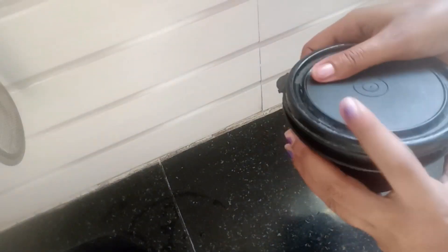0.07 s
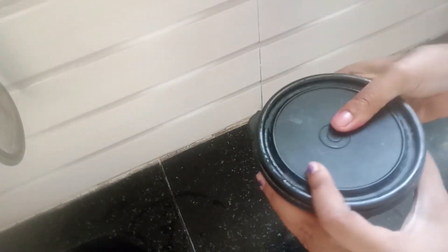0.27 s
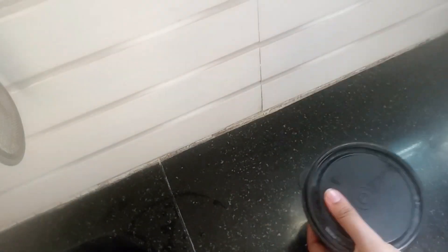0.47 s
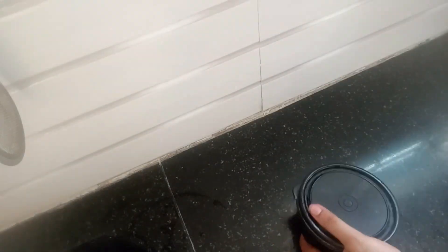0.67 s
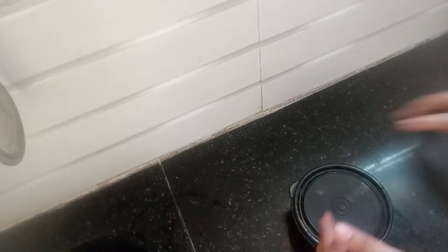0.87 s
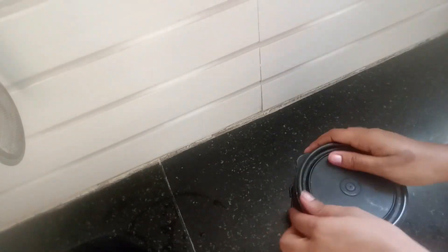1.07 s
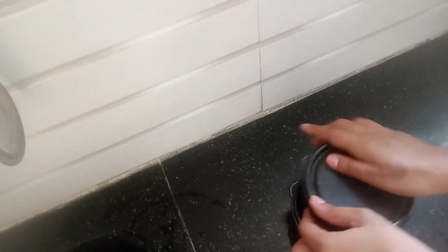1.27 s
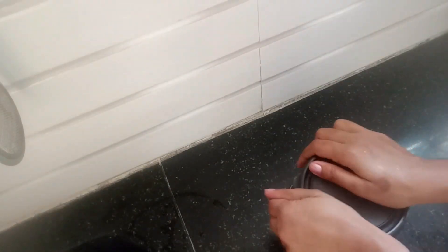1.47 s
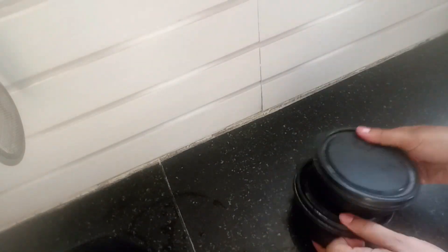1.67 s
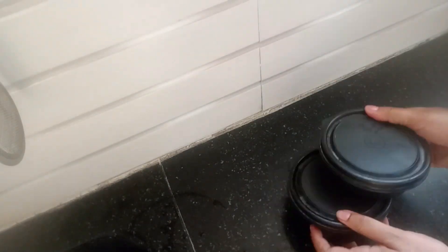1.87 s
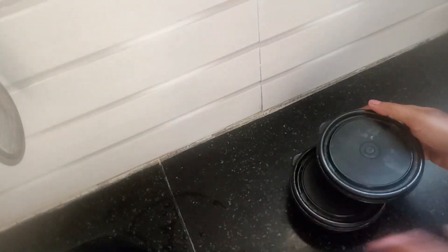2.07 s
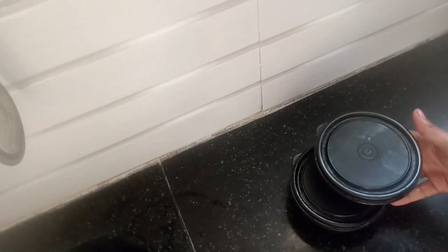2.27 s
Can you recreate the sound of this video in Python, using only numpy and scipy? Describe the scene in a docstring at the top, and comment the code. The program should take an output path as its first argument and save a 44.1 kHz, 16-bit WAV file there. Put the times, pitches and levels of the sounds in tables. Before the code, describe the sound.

Plastic lunch box lid snaps shut, box knocks onto stone counter, second box stacked and slid

```python
"""A round plastic lunch box clicks shut and is set down on a stone kitchen counter, knocking and rocking.
Its rim scrapes as it is pressed home; a second box is put on top and slid along with a hollow groan.
Faint creaks and thin high jingles come and go throughout, over quiet room noise.
Knocks and bumps are sums of decaying modes; scrapes are random stick-slip clicks through resonances;
the groan is a roughened tone, creaks and jingles are narrow-band noise, and the room is shaped noise."""
import sys
import numpy as np
from scipy import signal
from scipy.fft import rfft, irfft, next_fast_len
from scipy.io import wavfile

SR = 44100
rng = np.random.default_rng(int(sys.argv[2]) if len(sys.argv) > 2 else 0)


def transcribe(u):
    """Save the signal u as a 16-bit wav file named by the first command-line argument.

    u: samples, shape (n,) or (channels, n), limited to [-1, 1]; the rate is SR.
    q: integer samples, one column per channel.
    """
    v = np.clip(np.atleast_2d(u).T, -1, 1)
    q = np.round(v * 32767).astype(np.int16)
    wavfile.write(sys.argv[1], SR, q)


N = 101518
T = np.arange(N) / SR  # time in seconds

# Spectrum of the room noise. Each row: frequency in Hz, relative level in dB.
AIR_SPECTRUM = [(120, -38.5), (200, 0.5), (409, 0), (519, -2.5), (851, -5), (1230, -7.5), (1590, -8.5),
                (2610, -15), (3690, -13), (6520, -22), (9400, -14.5), (10700, -26), (14900, -31),
                (16000, -54)]
# Course of the room noise. Each row: time in seconds, level in dB.
AIR_LEVEL = [(0, -55), (.6, -55), (1.2, -51.5), (1.4, -64.5), (1.76, -62.5), (2.0, -58), (2.3, -58)]
# Spectrum of the low room rumble. Each row: frequency in Hz, relative level in dB.
RUMBLE_SPECTRUM = [(20, -10), (50, -1.5), (85, -4.5), (120, 0.5), (165, -3.5), (230, -17.5), (500, -27),
                   (16000, -75)]
# Course of the rumble. Each row: time in seconds, level in dB.
RUMBLE_LEVEL = [(0, -53), (.4, -53), (.9, -50.5), (1.25, -53.5), (1.5, -71), (1.8, -63), (2.3, -59.5)]
# Low creaks of plastic and thin high jingles. Each row: peak in seconds, # time from peak to 1/e in seconds,
# pitch in Hz, width in Hz (doubled in each of two resonators), level in dB.
CREAKS_AND_JINGLES = [ (0.248, 0.026, 782, 71, -45), (0.256, 0.011, 7150, 194, -67),
                      (0.545, 0.048, 4630, 130, -59), (0.542, 0.019, 9340, 200, -62),
                      (0.6, 0.024, 800, 123, -49.5), (0.777, 0.015, 578, 61, -44),
                      (0.986, 0.037, 4800, 252, -54.5), (0.999, 0.0066, 1930, 300, -37),
                      (1.11, 0.019, 4510, 244, -51), (1.195, 0.11, 4550, 350, -55),
                      (1.396, 0.006, 830, 60, -42), (1.397, 0.0079, 1960, 127, -30),
                      (1.401, 0.01, 9470, 400, -38.5), (1.443, 0.052, 457, 38.8, -46),
                      (1.54, 0.023, 8200, 250, -51.5), (1.694, 0.029, 7160, 248, -51.5),
                      (1.818, 0.028, 7000, 148, -57.5), (1.823, 0.028, 8100, 200, -57),
                      (1.8, 0.021, 11600, 900, -60), (1.912, 0.0086, 2460, 60, -31),
                      (1.979, 0.028, 8050, 130, -49.5), (2.006, 0.028, 6950, 150, -58),
                      (2.074, 0.017, 7200, 276.7, -47.5), (2.102, 0.0088, 8160, 150, -48.5),
                      (2.153, 0.017, 6900, 130, -44), (2.158, 0.023, 8240, 128, -45),
                      (2.221, 0.021, 7430, 60.5, -43), (2.254, 0.028, 7050, 306, -46.5),
                      (2.245, 0.018, 9240, 100, -50), (2.286, 0.0043, 1690, 148, -43),
                      (2.289, 0.0091, 8330, 357, -34.5)]
# Groan of the sliding upper box. Each row: time in seconds, level in dB, pitch in Hz.
SLIDE = [(2.02, -95, 492), (2.04, -51, 508), (2.09, -37.5, 517), (2.13, -38, 435.5), (2.146, -51.5, 444),
         (2.188, -40.5, 498), (2.21, -59, 513), (2.234, -82, 426), (2.268, -42, 412), (2.3, -33.5, 515)]
# Soft bumps of the hands on the box. Each row: start in seconds, mode in Hz, level in dB.
BUMPS = [(0.137, 300, -31.5), (0.142, 108, -38), (0.361, 288, -35), (1.166, 264, -34), (1.256, 240, -28),
         (1.386, 106, -25.5), (1.467, 114, -36), (1.554, 240, -22.5), (1.556, 466, -32), (1.686, 287, -26)]
# Rim scraping and fingers brushing; the row at 1.934 s is the bright treble crack of the knock there. # Each
# row: peak in seconds, rise and fall to 1/e in seconds, # levels of bass, middle, treble and top fizz in dB.
SCRAPES = [ (0.0274, 0.0051, 0.011, -36.5, -29.5, -42, -64), (0.122, 0.0033, 0.03, -41.5, -47, -47.5, -55),
           (0.373, 0.013, .04, -47.5, -55, -65, -70), (0.405, 0.0094, 0.017, -70, -71, -60, -66),
           (0.721, 0.0046, 0.024, -71, -53, -43, -56), (0.87, 0.027, 0.087, -63, -62, -58, -65),
           (0.938, 0.0098, 0.0089, -26.5, -24, -35.5, -70), (1.011, 0.01, 0.0049, -33.5, -25, -43.5, -76),
           (1.025, .01, 0.072, -54, -71, -68, -77), (1.176, 0.011, 0.027, -46, -64, -54.5, -78),
           (1.262, 0.014, 0.026, -50.5, -48, -58, -75), (1.330, 0.03, 0.017, -53, -52.5, -52, -61),
           (1.385, 0.0012, 0.008, -50.5, -31.5, -43, -43), (1.398, 0.0036, 0.012, -40, -29, -41, -39.5),
           (1.472, .03, 0.021, -55, -52.5, -58, -60), (1.534, 0.024, 0.042, -50.5, -52, -53, -65),
           (1.615, 0.0056, 0.015, -49, -45.5, -35.5, -60), (1.685, 0.036, 0.026, -44.5, -52.5, -53.5, -58),
           (1.887, 0.021, 0.036, -43.5, -66, -56, -63), (1.934, 0.003, 0.0072, -32, -53, -24.5, -30),
           (1.983, 0.015, 0.017, -65, -60, -44.5, -62), (2.074, 0.031, 0.026, -57, -54.5, -49, -52),
           (2.144, .011, 0.018, -64, -59, -40.5, -46.5), (2.243, 0.019, 0.084, -70, -75, -61, -49.5)]
# Spectra of the scraping layers. Each row: frequency in Hz, relative level in dB.
SCRAPE_BASS = [(40, -29), (105, 4), (155, -15), (230, 2.5), (330, 1.5), (500, -10), (750, -20),
               (1500, -36.5), (16000, -40)]
SCRAPE_TREBLE = [(100, -49), (1800, -27), (3300, 0), (5200, 3.5), (6500, 0.5), (8200, 6.5), (9700, 10),
                 (11200, -11.5), (16000, -12)]
SCRAPE_FIZZ = [(100, -38), (7000, -38), (10500, -3), (12000, -6), (16000, -12.5)]
# Resonances of the flexing lid. Each row: frequency in Hz, width in Hz, relative level in dB.
LID_MODES = [(515, 210, 5.5), (812, 130, 8.5), (1063, 124, 8.5), (1380, 420, 2), (1860, 260, 2),
             (2510, 900, -11.5), (2920, 860, -11), (3660, 230, 1), (5500, 510, -13.5)]
# Plastic knocks. Each row: start in seconds, wall pitch in Hz, wall level in dB, wall T60 in seconds,
# hollow level in dB, shell level in dB, shell tilt in dB per octave, crack level in dB,
# snap level in dB (before doubling).
KNOCKS = [ (0.0302, 550, -7.5, 0.035, -41, -26, -4, -26, -5),
          (0.0304, 729, -21, 0.056, -38, -29, -7, -35, -11),
          (0.6286, 291, -4, 0.049, -39, -10.5, -2, -17.5, -6.5),
          (0.6386, 358, -9.5, 0.013, -23, -14, -1, -26, -43),
          (0.7459, 324.6, -17, 0.062, -46, -35, 5, -35, -25),
          (0.7509, 315, -17.5, 0.033, -30, -26.5, -5, -33.5, -46),
          (0.7584, 430, -15, 0.026, -35, -34.5, 1, -35, -24),
          (0.931, 398, -17, 0.046, -27, -34.5, -13, -35, -9.5),
          (0.935, 501, -20, 0.046, -17.5, -21.5, 8.5, -27.5, -4),
          (0.9425, 402, -17.5, 0.033, -22, -43, -1, -53, -32),
          (1.0112, 498, -23.5, .055, -43, -46, -9, -35, -18),
          (1.0699, 318, -52, 0.026, -39, -47.5, 19.5, -40, -29),
          (1.3847, 328, -45.5, .05, -29, -25, -1.5, -41, -46),
          (1.394, 450, -43, 0.078, -24.5, -50, 4, -41, -38),
          (1.7859, 358, -46.5, 0.068, -53, -50, 17, -46, -54),
          (1.9003, 413, -12.5, 0.088, -25.5, -15.5, 3.5, -27, -12),
          (1.9103, 413, -40, 0.058, -16, -19, 2, -28, -35),
          (1.9336, 298.4, -5.5, 0.04, -21, -28, 8, -38, -34),
          (1.934, 554, -8, 0.029, -48, -26, -4.5, -30, -15),
          (2.2836, 450, -50, 0.045, -60, -57, -6, -41, -41)]
# Stiff modes of the box. Each row: frequency in Hz, relative level in dB, T60 in seconds.
SHELL_MODES = [(1050, -6.5, 0.029), (1184, -7, 0.024), (1233, -14, 0.048), (1388, -9, 0.022),
               (1670, -24.5, 0.041), (2150, -13.5, 0.035), (2442, -17, 0.023), (3273, -10, 0.022),
               (3583, -13.5, 0.058), (3924, -9.5, 0.032), (5155, -13, 0.023), (7010, -18.5, 0.028),
               (8500, -17, 0.034), (9870, -20.5, 0.044)]
# Spectrum of a crack. Each row: frequency in Hz, relative level in dB.
CRACK_SPECTRUM = [(60, -48), (300, 1), (750, 8), (1200, 11), (1900, 6), (2900, -8.5), (3800, 3.5),
                  (5300, 5), (7000, 0.5), (9600, 3), (11500, -8.5), (16000, -13)]

ROOM_DB, ROOM_DELAY_S, ROOM_T60_S, ROOM_TOP_HZ = -22.5, 0.0085, 0.13, 6030
SLIDE_ROUGH, SLIDE_WIDTH_HZ = 0.5, 55  # depth and bandwidth of the judder
BUMP_RISE_S, BUMP_T60_S = 0.0045, 0.047
SLIPS_PER_S, SLIP_SPREAD_DB, RUB_HISS, LID_TOP_HZ = 2500, 3.5, 0.53, 5940
HOLLOW_HZ, HOLLOW_T60_S = 220.5, 0.077
MODE_SPREAD_DB, MODE_DETUNE = 0.5, 0.0019  # random spread of mode level, and of pitch as a fraction
CRACK_T60_S, SNAP_HZ, PLASTIC_TOP_HZ = 0.027, 3130, 9300
RADIATE_SHARE = 0.67  # radiation cutoff as a share of the mode's frequency
BASS_CUT_HZ, TOP_CUT_HZ = 75, 15700


def from_db(db):
    """Level law: amplitude gain grows tenfold every 20 dB."""
    return 10 ** (np.asarray(db) / 20)


def rms_one(x):
    """Normalisation to unit rms."""
    return x / np.sqrt(np.mean(x ** 2) + 1e-20)


def lowpass(x, order, hz):
    """Butterworth low-pass: a flat passband, then a smooth fall."""
    return signal.sosfilt(signal.butter(order, hz, fs=SR, output="sos"), x)


def highpass(x, hz):
    """Second-order Butterworth high-pass: a fall of 12 dB per octave below the cutoff."""
    return signal.sosfilt(signal.butter(2, hz, "high", fs=SR, output="sos"), x)


def colour(x, points):
    """Minimum-phase filtering: folding the cepstrum makes a spectrum causal; rms 1."""
    size = 2 * next_fast_len(N)
    hz, db = np.transpose(points)
    bins_hz = np.arange(size // 2 + 1) * SR / size
    curve_db = np.interp(np.log(bins_hz + 1), np.log(hz), db)
    cepstrum = irfft(np.log(from_db(curve_db)))[:size // 2]
    response = np.exp(2 * rfft(cepstrum, size))
    return rms_one(irfft(rfft(x, size) * response)[:N])


def resonate(x, hz, width_hz):
    """Two-pole resonance: the pole radius sets the width, with gain about 1 at the peak."""
    r = np.exp(-np.pi * width_hz / SR)
    zeros = np.array([1, 0, -1]) * (1 - r * r) / 2
    poles = [1, -2 * r * np.cos(2 * np.pi * hz / SR), r * r]
    return signal.lfilter(zeros, poles, x)


def decay(s, t60):
    """Exponential decay: 60 dB are lost in t60 seconds after time s."""
    return (T >= s) * from_db(-60 * np.clip((T - s) / t60, 0, 4))


def ring(s, hz, t60):
    """Damped free vibration: a mode struck at time s is a decaying sine."""
    out, first = np.zeros(N), int(s * SR)
    t = T[:min(N - first, int(2 * t60 * SR))]
    out[first:first + len(t)] = np.sin(2 * np.pi * hz * t) * np.exp(-np.log(1000) * t / t60)
    return out


def radiate(x, hz):
    """Radiation efficiency: a small box sends out little below the pitch of the mode."""
    return highpass(x, RADIATE_SHARE * hz)


def slips():
    """Stick-slip friction: dense random clicks of uneven size and sign over a little hiss."""
    sizes = from_db(SLIP_SPREAD_DB * np.minimum(rng.exponential(1, N), 4))
    signed = sizes * rng.choice([-1, 1], N)
    clicks = signed * (rng.random(N) < SLIPS_PER_S / SR)
    return rms_one(clicks) + RUB_HISS * rng.standard_normal(N)


def background(spectrum, level):
    """Stationary noise: a fixed spectrum at a slowly changing level."""
    return from_db(np.interp(T, *np.transpose(level))) * colour(rng.standard_normal(N), spectrum)


def kitchen(x):
    """Diffuse reverberation: the tiled walls return a faint, short tail of decaying noise."""
    noise = lowpass(rng.standard_normal(N), 1, ROOM_TOP_HZ)
    tail = noise * decay(ROOM_DELAY_S, ROOM_T60_S)
    return from_db(ROOM_DB) * signal.fftconvolve(x, tail / np.linalg.norm(tail))[:N]


def creaks_and_jingles():
    """Narrow-band noise: sharp resonances turn noise into unsteady tones that swell and fade."""
    out = np.zeros(N)
    for s, length, hz, width, db in CREAKS_AND_JINGLES:
        swell = np.exp(-((T - s) / length) ** 2)
        once = resonate(rng.standard_normal(N), hz, 2 * width)
        tone = resonate(once, hz, 2 * width)
        loudness = np.sqrt(np.average(tone ** 2, weights=swell ** 2))  # rms within the swell
        out += from_db(db) * swell * tone / loudness
    return out


def slide():
    """Random modulation: plastic juddering over plastic roughens a wavering low tone."""
    s, db, hz = np.transpose(SLIDE)
    phase = 2 * np.pi * np.cumsum(np.interp(T, s, hz)) / SR
    judder = lowpass(rng.standard_normal((2, N)), 2, SLIDE_WIDTH_HZ)
    along, across = (rms_one(v) for v in judder)
    in_phase = (1 + SLIDE_ROUGH * along) * np.sin(phase)
    quadrature = SLIDE_ROUGH * across * np.cos(phase)
    return (T > s[0]) * from_db(np.interp(T, s, db)) * rms_one(in_phase + quadrature)


def bumps():
    """Soft impact: a gradual contact wakes only one low wall mode."""
    out = np.zeros(N)
    for s, hz, db in BUMPS:
        onset = np.clip((T - s) / BUMP_RISE_S, 0, 1)
        out += from_db(db) * ring(s, hz, BUMP_T60_S) * onset
    return out


def scrapes():
    """Friction-driven resonance: rubbing swells and lets go, shaking box and lid and hissing on top."""
    friction = slips()
    flexing = sum(from_db(db) * resonate(friction, hz, width) for hz, width, db in LID_MODES)
    lid = rms_one(lowpass(flexing, 2, LID_TOP_HZ))
    bass = colour(slips(), SCRAPE_BASS)
    treble = colour(slips(), SCRAPE_TREBLE)
    fizz = colour(slips(), SCRAPE_FIZZ)
    layers = np.array([bass, lid, treble, fizz])
    out = np.zeros(N)
    for s, rise, fall, *levels_db in SCRAPES:
        swell = np.exp(-np.abs((T - s) / np.where(T < s, rise, fall)) ** 1.304)
        out += swell * (from_db(levels_db) @ layers)
    return out


def knocks():
    """Modal impact: a knock rings wall, hollow and shell, and starts with a snap and a short crack."""
    body, cracks = np.zeros(N), np.zeros(N)
    grit = colour(rng.standard_normal(N), CRACK_SPECTRUM)
    centre_hz = np.median([mode[0] for mode in SHELL_MODES])
    for s, wall_hz, wall_db, wall_t60, hollow_db, shell_db, tilt, crack_db, snap_db in KNOCKS:
        body += from_db(wall_db) * radiate(ring(s, wall_hz, wall_t60), wall_hz)
        body += from_db(hollow_db) * radiate(ring(s, HOLLOW_HZ, HOLLOW_T60_S), HOLLOW_HZ)
        for k, (hz, db, t60) in enumerate(SHELL_MODES):
            tilt_db = tilt * np.log2(hz / centre_hz)
            mode_db = shell_db + db + tilt_db + MODE_SPREAD_DB * rng.standard_normal()
            mode_hz = hz * (1 + MODE_DETUNE * rng.standard_normal())
            body += (-1) ** k * from_db(mode_db) * ring(s, mode_hz, t60)  # alternating polarity
        body += 2 * from_db(snap_db) * ring(s, SNAP_HZ, 2 / SNAP_HZ)  # 60 dB down in two cycles
        cracks += from_db(crack_db) * grit * decay(s, CRACK_T60_S)
    return lowpass(body, 3, PLASTIC_TOP_HZ) + cracks


def scene():
    """Superposition: the sources close by, their reverberation, and quiet room noise."""
    near = knocks() + scrapes() + bumps() + slide() + creaks_and_jingles()
    room = background(AIR_SPECTRUM, AIR_LEVEL) + background(RUMBLE_SPECTRUM, RUMBLE_LEVEL)
    return (near + kitchen(near) + room)[None]


def record(dry):
    """Band limiting: the microphone thins the deep bass, and a steep elliptic filter cuts the top."""
    thin = highpass(dry, BASS_CUT_HZ)
    return signal.sosfilt(signal.ellip(10, 0.1, 80, TOP_CUT_HZ, fs=SR, output="sos"), thin)


dry = scene()
out = record(dry)
transcribe(out)
```